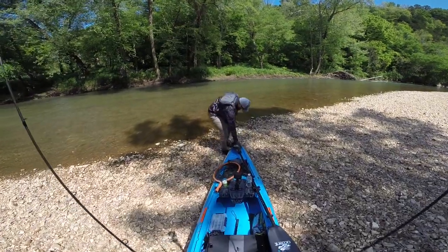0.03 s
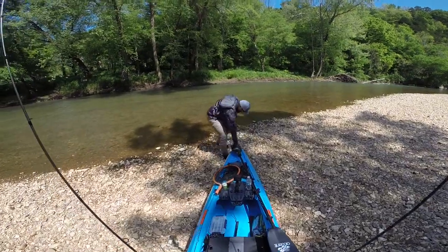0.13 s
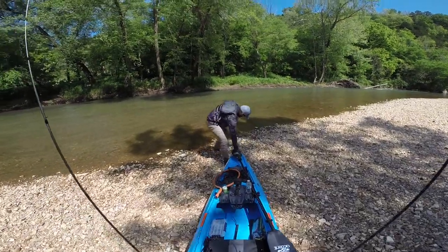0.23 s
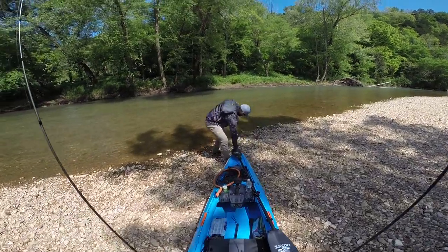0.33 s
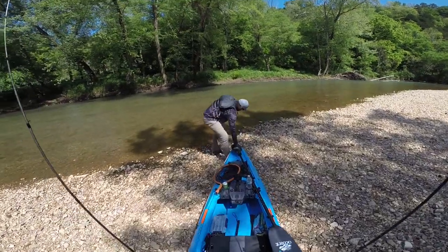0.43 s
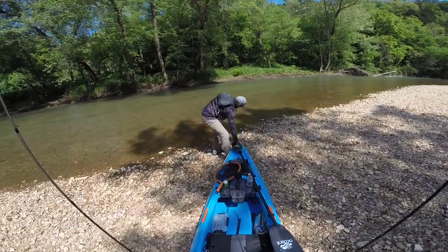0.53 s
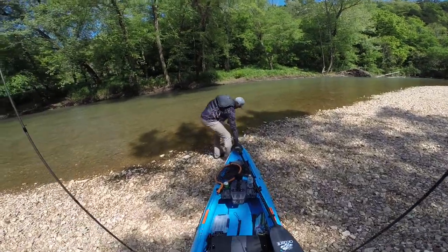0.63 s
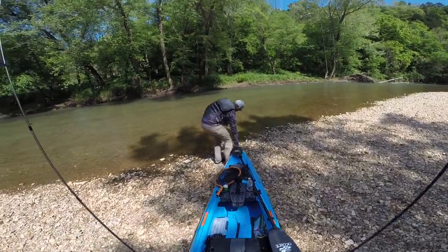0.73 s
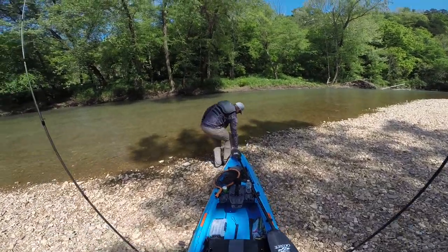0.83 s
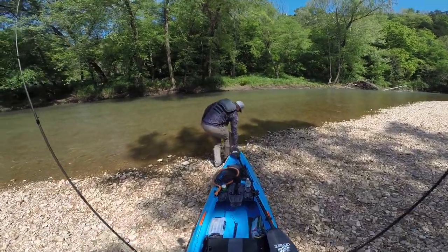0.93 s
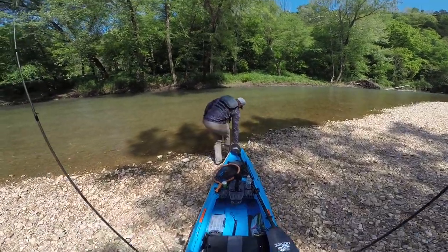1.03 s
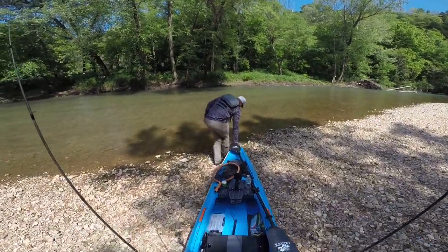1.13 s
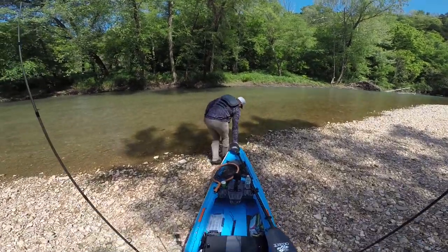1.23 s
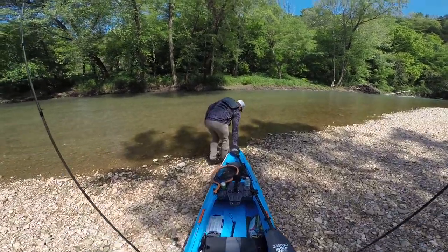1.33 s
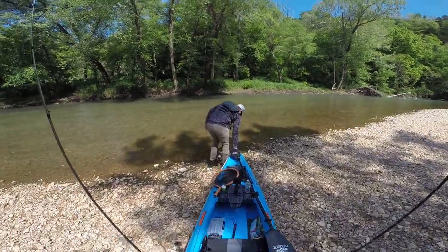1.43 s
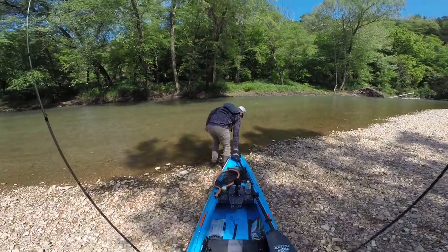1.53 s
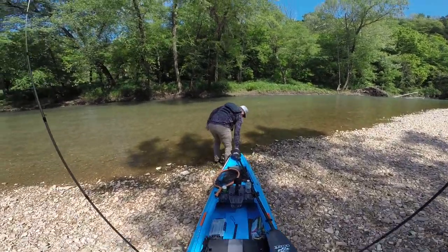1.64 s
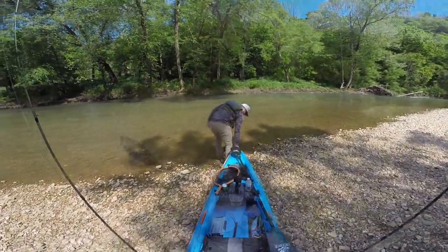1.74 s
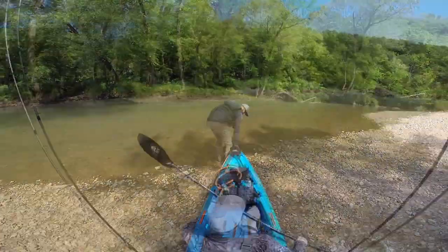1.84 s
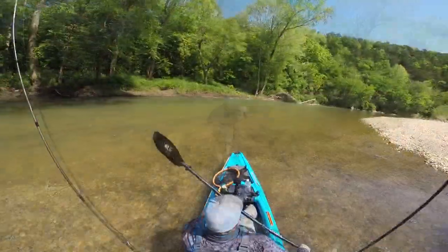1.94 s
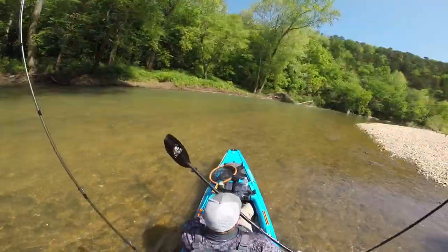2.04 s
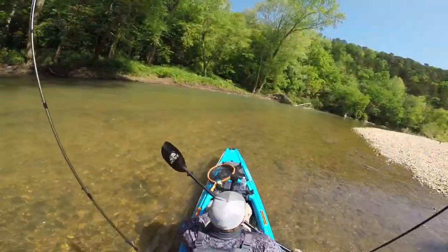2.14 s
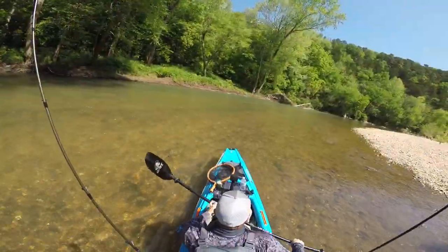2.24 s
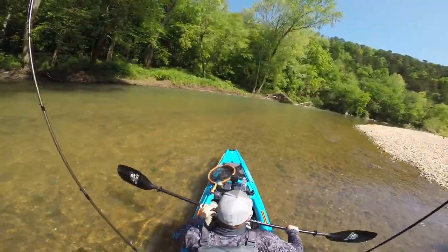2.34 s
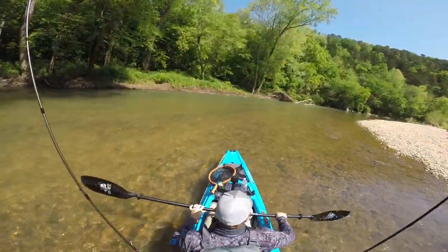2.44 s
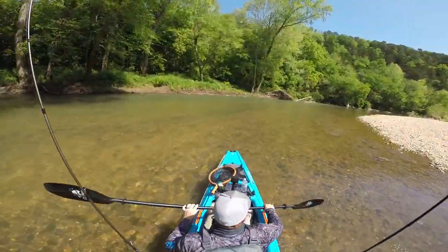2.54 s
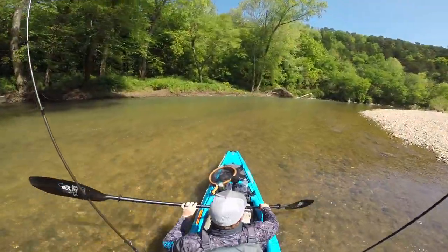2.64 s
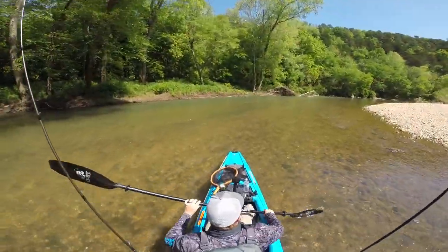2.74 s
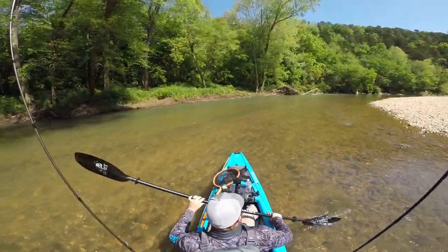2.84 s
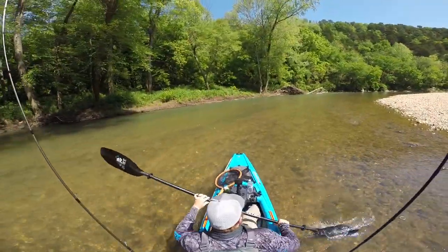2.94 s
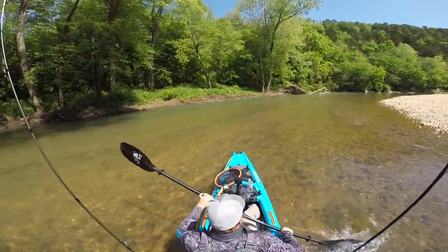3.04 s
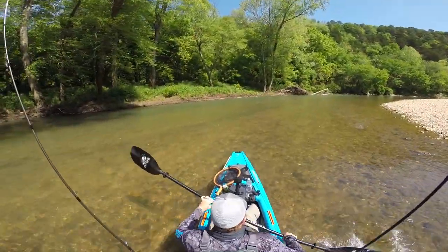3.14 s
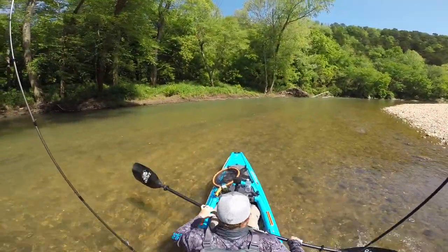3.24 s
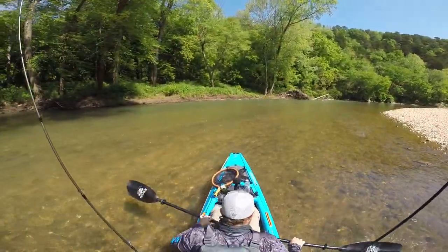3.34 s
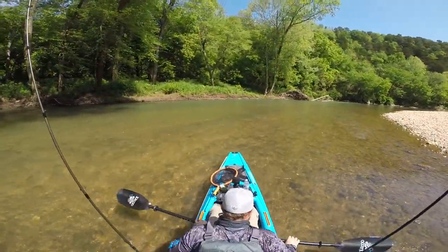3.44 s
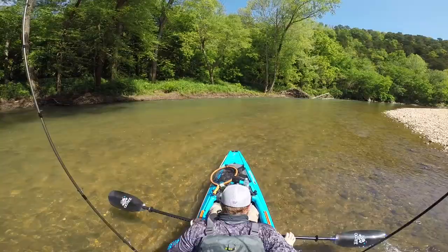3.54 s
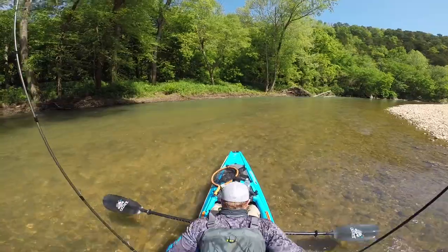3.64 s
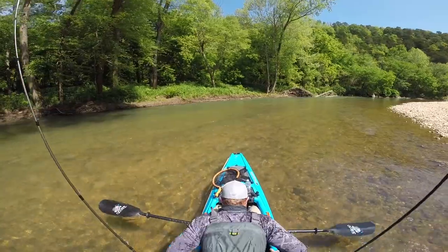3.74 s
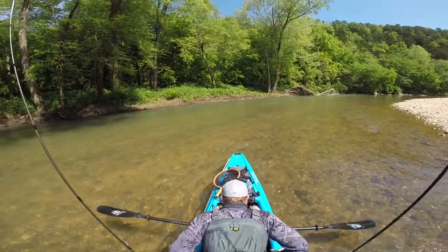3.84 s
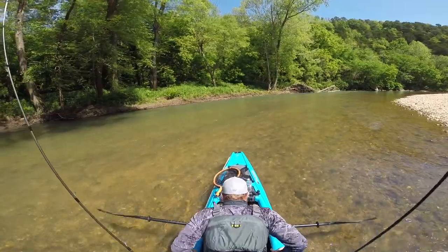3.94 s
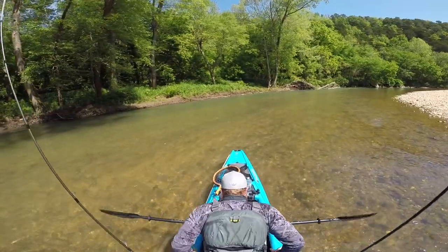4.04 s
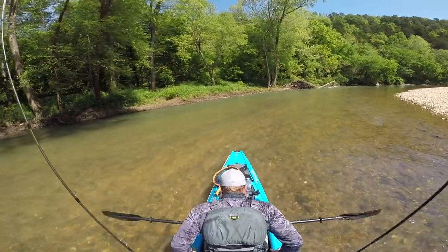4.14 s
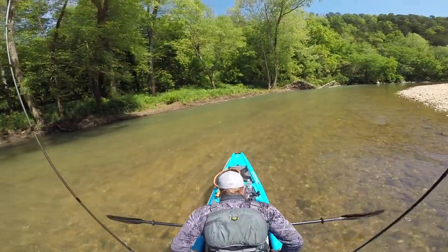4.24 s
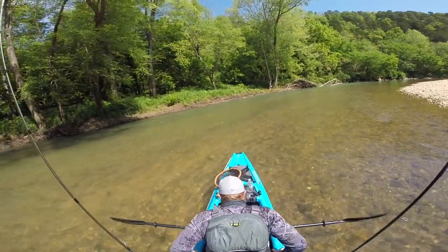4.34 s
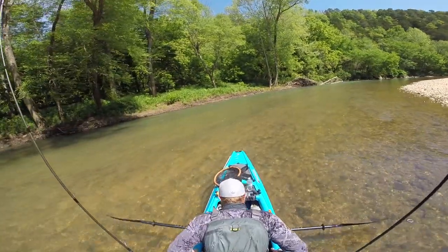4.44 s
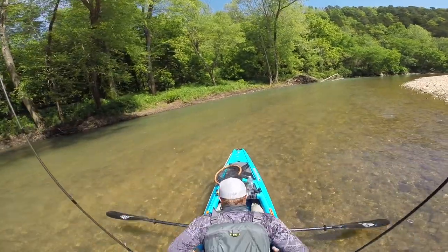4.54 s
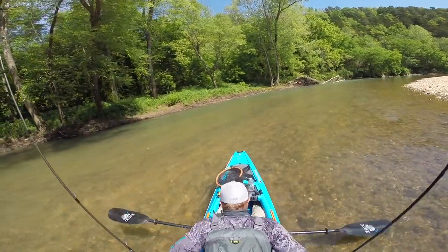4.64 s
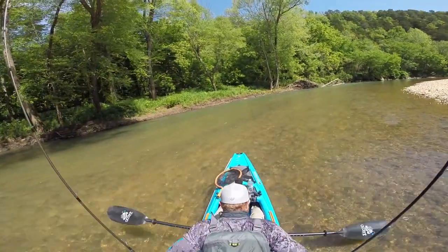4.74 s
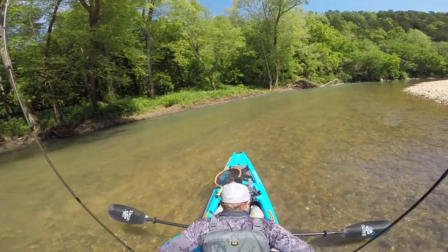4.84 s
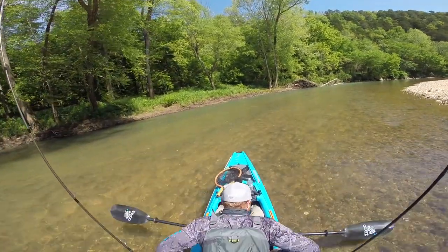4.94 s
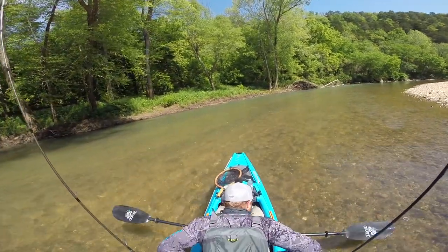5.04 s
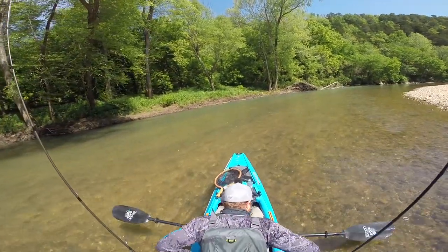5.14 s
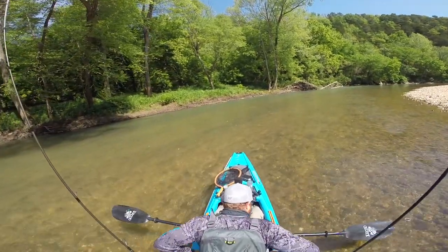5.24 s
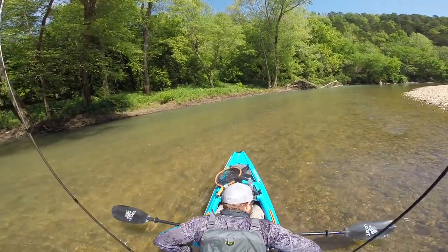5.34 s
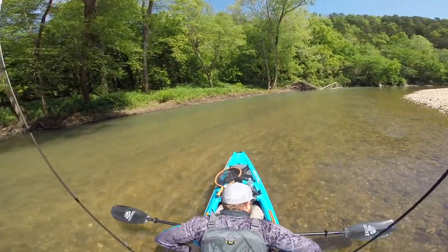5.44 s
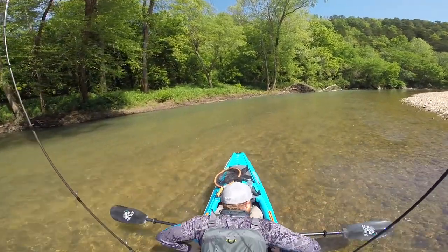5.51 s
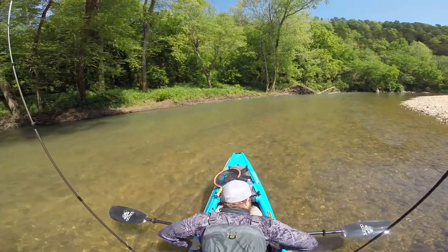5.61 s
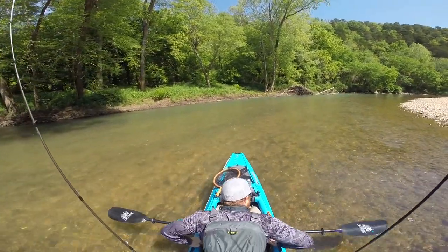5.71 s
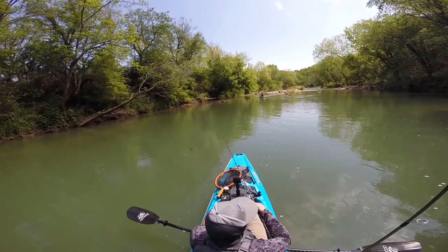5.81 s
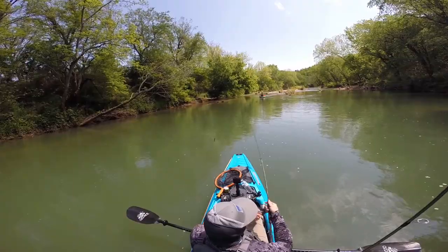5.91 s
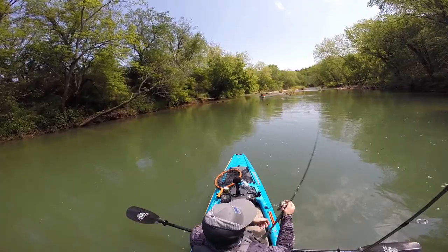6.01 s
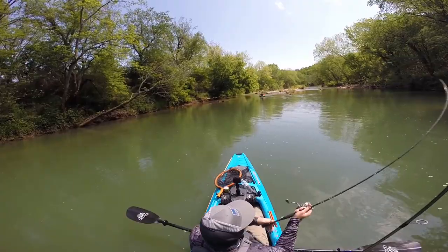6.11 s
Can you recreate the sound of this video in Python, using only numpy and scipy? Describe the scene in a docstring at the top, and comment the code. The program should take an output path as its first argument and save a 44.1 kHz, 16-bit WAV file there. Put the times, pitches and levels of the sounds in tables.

```python
"""Stones grind under a plastic kayak dragged over river gravel; then it floats off with a paddle stroke. The
microphone is close: it rides on a pole fixed to the hull, shut in a case. Chance contacts ring the hull's
modes; loose gravel and water rattle in the air as coloured grains, rings and snaps, their bright band changing
colour once. Gear knocks on the deck as blows with slips, jolts thud, and gurgles are climbing tones. Low noise
is wind and pole shake, faint noise the river, with thin steady whines."""
import sys
import numpy as np
from scipy import signal
from scipy.fft import rfft, irfft
from scipy.io import wavfile

SR = 44100
rng = np.random.default_rng(int(sys.argv[2]) if len(sys.argv) > 2 else 0)


def log_audio(samples):
    """Write samples as a 16-bit WAV file to the path given in sys.argv[1]."""
    # one column per channel
    frames = np.atleast_2d(samples).T
    # limit to full scale, then quantise
    limited = np.clip(frames, -1, 1)
    pcm = np.round(limited * 32767).astype(np.int16)
    wavfile.write(sys.argv[1], SR, pcm)


N = 272046  # samples

# Hull modes, the last one the case's own: pitch_hz, width_hz, relative_level_db
HULL_MODES = [(78.4, 35, -9.5), (106.8, 10, -8), (144.5, 47, -6), (202, 18, -5.5), (248.2, 28, -5.5),
              (296, 28.6, -0.5), (357.7, 67, -1.5), (485, 60, -3.5), (551, 210, -1.5), (672, 69, -2),
              (785, 170, 0.5), (888.7, 72, 0.5), (972, 76, -4.5), (1173, 30.4, -13.5), (1334, 93, -1.5)]
# Steady working of stones, then water, under the hull, before the case's filtering:
# time_s, upper_modes_rms_db, lower_modes_rms_db, case_resonance_rms_db
GRIND_CURVE = [(0, -24.5, -31, -59), (.29, -29.5, -31.5, -34.5), (.4, -22.5, -31.5, -36.5),
               (.56, -31, -38, -54), (.66, -22, -34.5, -43), (.8, -32, -42, -42), (.85, -27, -22, -39),
               (1.0, -19, -24, -29), (1.2, -22.5, -23, -42), (1.41, -25, -26.5, -35.5),
               (1.79, -24.5, -33, -34), (1.93, -31, -33, -36.5), (2.2, -35.5, -41.5, -56),
               (2.32, -39, -54, -49), (2.62, -48, -56, -73), (2.9, -54.5, -59, -54),
               (3.12, -44, -54, -56.5), (3.17, -39.5, -38.5, -58), (3.45, -34, -38, -55),
               (3.65, -39.5, -43, -43.5), (3.7, -42, -46, -60), (3.93, -46, -47.5, -52),
               (4.1, -51.5, -55.5, -72), (4.3, -55, -70, -74), (4.45, -54, -52.5, -64),
               (4.78, -53, -63, -63.5), (5.3, -56.5, -51, -53.5), (5.6, -57, -58.5, -70),
               (6.17, -56.5, -59, -79)]
# Loose gravel and running water through the air: time_s, mid_band_rms_db, high_band_rms_db
RATTLE_CURVE = [(0, -44, -55), (.45, -42.5, -59.5), (.87, -41, -52), (1.05, -38.5, -51), (1.3, -37, -52),
                (1.65, -48, -58), (1.72, -41, -58), (1.92, -44, -58.5), (2.14, -45, -51),
                (2.45, -52, -58.5), (2.6, -56, -62), (2.87, -61, -66), (3.1, -52, -61), (3.18, -43.5, -48),
                (3.47, -44, -48.5), (3.72, -50.5, -56.5), (3.9, -53, -58.5), (4.13, -55.5, -66),
                (4.3, -62.5, -70), (4.6, -60.5, -70.5), (5.0, -63, -80), (6.17, -61, -82)]
# Lowest sounds: time_s, wind_and_pole_rms_db, hull_boom_rms_db (boom before the case's filtering)
LOW_CURVE = [(0, -52, -38), (.33, -48, -43.5), (.6, -60, -40), (.75, -45.5, -23), (1.41, -40, -30),
             (1.63, -43, -27), (1.7, -50, -42), (1.86, -50, -39), (1.94, -40, -38), (2.06, -28.5, -29),
             (2.25, -43.5, -39.5), (2.45, -43, -63), (2.7, -57.5, -67), (3.04, -44, -62), (3.14, -35, -61),
             (3.26, -47, -48), (3.7, -46, -73), (4.12, -46.5, -52.5), (4.4, -56.5, -55.5), (4.69, -41, -47),
             (4.77, -55.5, -54), (5.12, -56, -62), (5.46, -56, -54), (5.6, -47, -78), (5.8, -55, -54),
             (5.88, -61.5, -57), (6.17, -55, -55)]
# Colours of the air sounds, the low noise and the river: pitch_hz, relative_level_db (per Hz)
MID_RATTLE_COLOUR = [(850, -26), (1450, -1.5), (1550, -8), (1890, -9), (2440, -8.5), (2860, -10),
                     (3150, -10), (4120, -30.5), (4400, -57), (5720, -41), (9680, -120)]
EARLY_HIGH_COLOUR = [(2240, -19), (3800, 7), (4150, -38), (4420, -2.5), (5050, -5), (6710, 1.5), (7750, -1),
                     (8910, -13.5), (10300, -10.5), (11600, -19), (13900, -11), (14600, -30), (15200, -26)]
LATE_HIGH_COLOUR = [(2240, 7.5), (3800, -4), (5320, 4.5), (5940, 5), (6360, 1), (7060, -13), (10500, -11),
                    (11600, -16), (12800, -12), (15200, -18)]
RUMBLE_COLOUR = [(12, -21), (25, 0), (45, -8.5), (70, -7), (120, -34)]
RIVER_COLOUR = [(59, -34), (100, 2), (209, 0.5), (346, -7), (768, 1.5), (1570, -12.5), (2110, -13.5),
                (4580, -15), (5650, -17.5), (12600, -29), (15200, -44)]
# Faint steady whines: start_s, pitch_hz, rms_db
WHINES = [(0, 8780, -95), (0, 11719, -92), (5.817, 14626, -82)]
# Bright snaps: start_s, relative_level_db
SNAPS = [(0.1356, -40), (0.163, -36), (0.1865, -49.5), (0.466, -35), (0.523, -28), (0.772, -36),
         (0.816, -41), (0.925, -38), (0.939, -32), (0.9717, -41), (0.9976, -35), (1.2017, -46),
         (1.3234, -44), (1.442, -29.5), (1.484, -35), (1.509, -28), (1.5534, -40), (1.578, -30.5),
         (1.671, -29.5), (2.0128, -41), (2.2353, -37), (2.471, -41), (2.5037, -50), (2.649, -45),
         (3.1263, -39), (3.174, -41), (3.4151, -47), (3.4531, -46), (3.5124, -44), (3.6631, -45),
         (3.7519, -36), (3.78, -44), (3.8117, -45), (4.0317, -48), (5.648, -44), (5.758, -48), (5.8, -46)]
# Crunches and splashes that build up and break off:
# peak_time_s, mid_band_level_db, high_band_level_db, build_up_s
CRUNCHES = [(.16, -48, -54, 0.026), (0.537, -39.5, -42, 0.041), (.9, -28, -65, 0.0068),
            (.94, -32, -55, 0.022), (1.02, -30.5, -47, 0.034), (1.101, -27.5, -44, 0.016),
            (1.2, -35, -47, 0.024), (1.227, -34, -49, 0.024), (1.27, -31, -64, 0.017),
            (1.328, -42, -57, 0.013), (1.673, -47, -43.5, 0.0042), (2.031, -55, -44.5, 0.058),
            (2.54, -51, -46, 0.06), (2.89, -56, -68, .012), (3.13, -59, -48, .01), (3.57, -47, -55, 0.019),
            (3.81, -48, -46, 0.034), (3.87, -60, -57, 0.0074), (5.236, -56, -70, 0.027),
            (5.38, -54, -74, 0.039), (5.435, -44.5, -56, .01), (5.672, -64, -69, .05),
            (5.76, -50, -58, 0.0045)]
# Knocks and short slips on the hull, before the case's filtering:
# start_s, peak_db, favoured_pitch_hz, relative_case_ring_db
KNOCKS = [(0.243, -20, 740, 14), (0.403, -18, 880, -24), (0.695, -2, 356, -13.5), (0.808, -11.5, 640, -13),
          (0.835, -10.5, 296, 7), (0.883, -8, 640, -9), (0.965, -12, 673, 0), (1.005, -5.5, 706, -29),
          (1.09, -7, 507, -21), (1.422, -13.5, 299, -5), (1.456, -8.5, 840, -24), (1.511, -14, 880, -31),
          (1.602, -8.5, 850, -26), (1.732, -13.5, 1080, -24), (2.027, -19.5, 955, -33),
          (2.226, -19, 320, -13), (2.302, -26, 880, -7), (2.507, -26.5, 765, -6), (2.717, -30, 855, -21),
          (2.894, -31, 900, -10), (3.139, -27, 282, -13), (3.293, -22.5, 331, 1), (3.359, -24, 748, -6),
          (3.429, -22.5, 856, -5), (3.791, -27.5, 293, -7), (3.834, -28, 870, -20), (3.872, -28, 980, -9),
          (3.914, -28, 710, -9), (3.941, -29, 918, -4), (4.048, -34, 840, -23), (4.133, -33, 740, -16),
          (4.158, -34, 830, -24), (4.436, -33, 256, -13), (4.493, -33, 624, -21), (4.67, -32.5, 885, -24),
          (4.857, -34.5, 666, -8), (4.985, -36, 624, -13), (5.081, -38, 640, -23), (5.112, -35, 670, -22),
          (5.198, -24, 910, -0.5), (5.227, -30, 830, -11), (5.256, -32, 635, -11), (5.313, -32.5, 970, -7),
          (5.377, -26, 700, -6), (5.419, -28.5, 940, 6), (5.522, -33, 1030, -6), (5.565, -37, 654, -6),
          (5.608, -41, 904, -13), (5.65, -40.5, 310, -25), (5.769, -27.5, 980, -8)]
# The hull is jolted: peak_time_s, upper_modes_db, lower_modes_db, boom_db, build_up_s, dying_s
JOLTS = [(.408, -32, -23.5, -31, 0.0035, 0.0094), (.697, -23.5, -14, -26, .002, 0.062),
         (0.84, -19.5, -20, -34, 0.012, 0.069), (1.455, -25, -16.5, -27.5, 0.016, 0.013),
         (2.18, -41, -34, -46, 0.034, 0.013), (2.519, -36.5, -40.5, -44, 0.018, .04),
         (3.8, -45, -37.5, -38, 0.056, 0.048), (3.88, -55, -44, -34, 0.037, 0.023),
         (4.162, -38.5, -66, -56, 0.014, 0.016), (4.511, -62, -53, -41, 0.021, .025),
         (4.64, -62, -54, -52, .04, 0.05), (4.85, -60, -49, -60, .02, .015),
         (5.119, -43, -66, -68, 0.0061, 0.034), (5.431, -40.5, -43.5, -52, 0.025, 0.014),
         (5.535, -66, -50, -64, 0.015, .015), (5.658, -50, -43.5, -44, 0.015, 0.022),
         (5.7, -65, -59, -42.5, 0.025, 0.026), (5.807, -42, -39.5, -32.5, 0.031, .005)]
# Ringing ticks of stones and drops: start_s, relative_level_db, pitch_hz
TICKS = [(0.4683, -33, 1940), (0.517, -21.5, 3260), (0.8185, -24.5, 3410), (0.8992, -19, 2130),
         (0.9208, -16, 2560), (1.0066, -34, 3200), (1.0224, -16, 1990), (1.0913, -16, 2300),
         (1.3223, -12.5, 2440), (1.324, -22, 3470), (0.9223, -22, 3330), (1.482, -24, 2620),
         (1.5088, -23.5, 3500), (1.5489, -29, 2740), (1.6165, -28, 2420), (1.648, -34, 2450),
         (1.672, -11.5, 3110), (2.0054, -27, 2660), (2.1625, -31, 2970), (2.399, -33, 2500),
         (2.7692, -36, 2520), (2.8953, -30.5, 2350), (3.031, -36, 2500), (3.1278, -35, 2430),
         (3.1624, -33, 1900), (3.2923, -25, 2020), (3.4526, -38, 2220), (3.5473, -28, 3060),
         (3.6012, -29, 2090), (3.875, -22.5, 2500), (4.0988, -32.5, 2660), (4.635, -31.5, 2590),
         (5.316, -39, 3020), (5.4166, -38, 3000), (5.7723, -35, 2140)]
# Gurgles under the hull and round the paddle blade, before the case's filtering:
# centre_s, peak_db, centre_pitch_hz, length_s (centre to 1/e of the peak)
GURGLES = [(1.999, -27.5, 250, 0.016), (2.18, -29.5, 310, 0.022), (2.966, -52, 275, 0.024),
           (3.027, -49, 336, 0.038), (3.076, -44, 360, .015), (3.186, -29, 270, 0.016),
           (3.245, -29.5, 205, 0.01), (3.311, -39, 316, .025), (3.382, -31, 638, 0.014),
           (3.44, -32.5, 300, 0.014), (3.565, -32, 210, 0.015), (3.645, -30, 300, 0.0076),
           (3.797, -34, 299, 0.011), (4.448, -51, 350, 0.014)]

BOOM_TOP_HZ, LOWER_TOP_HZ, UPPER_TOP_HZ = 170, 430, 1280  # mode groups; the case lies above
CASE_LOW_HZ, CASE_HIGH_HZ = 60, 1507  # hull vibration passed by the case
COLOUR_FADE_START_S, COLOUR_FADE_END_S = 1.75, 1.93  # the high band's colour crossfades
RIVER_RMS_DB = -58
CRUNCH_FALL_S = 0.01
KNOCK_SPREAD_OCT, SLIP_S = 0.35, 0.012  # modes near the favoured pitch ring; slips die away
THUD_DB, THUD_CONTACT_S = 13, 0.0014  # blow over the jolt's boom level, before build-up scaling
GURGLE_RISE = 0.12  # share by which the pitch climbs over one length
CUTOFF_HZ = 15350


def amp(db):
    """Decibels to amplitude."""
    return 10 ** (np.asarray(db) / 20)


def rms_one(x):
    """Scale to rms 1."""
    return x / np.sqrt(np.mean(x ** 2) + 1e-20)


def in_time(rows):
    """Columns of a curve table, drawn straight from point to point, sample by sample."""
    time_s, *columns = np.transpose(rows)
    return [np.interp(np.arange(N) / SR, time_s, column) for column in columns]


def swell(steady_db, peak_s, peak_db, rise_s, fall_s):
    """Level in dB with bursts added in power; each grows and dies away exponentially."""
    t, power = np.arange(N) / SR, amp(2 * steady_db)
    for at, db, rise, fall in np.broadcast(peak_s, peak_db, rise_s, fall_s):
        late = t - at
        slope_s = np.where(late < 0, max(rise, 1e-3), max(fall, 1e-3))
        power = power + amp(2 * db) * np.exp(-2 * np.abs(late) / slope_s)
    return 10 * np.log10(power)


def drift(rate_hz):
    """Slow chance: noise through a double one-pole low-pass, rms 1."""
    r = np.exp(-2 * np.pi * rate_hz / SR)
    noise = rng.standard_normal(N + SR)
    settled = signal.lfilter([1], [1, -2 * r, r * r], noise)[SR:]
    return rms_one(settled)


def grains(per_s, spread_db, clump_db, clump_rate):
    """Random contacts of uneven size that come in clumps, rms 1."""
    sizes = amp(spread_db * np.minimum(rng.exponential(1, N), 3.2)) * rng.choice([-1, 1], N)
    struck = rng.random(N) < per_s / SR
    return rms_one(sizes * struck * amp(clump_db * drift(clump_rate)))


def resonate(x, hz, width_hz):
    """A damped mode: a unit click sets a sine of starting height 1 ringing."""
    r, w = np.exp(-np.pi * width_hz / SR), 2 * np.pi * min(hz, 0.45 * SR) / SR
    return signal.lfilter([0, np.sin(w)], [1, -2 * r * np.cos(w), r * r], x + 1e-18)


def colour(x, spectrum):
    """Causal (minimum-phase) filter with the given spectrum, falling steeply outside it; rms 1."""
    size = 8192
    hz, db = np.transpose(spectrum)
    grid = np.log(np.maximum(np.arange(size // 2 + 1) * SR / size, 1))
    outside = np.maximum(np.log(hz[0]) - grid, 0) + np.maximum(grid - np.log(hz[-1]), 0)
    shape_db = np.interp(grid, np.log(hz), db) - np.minimum(60 * outside, 60)
    cepstrum = irfft(shape_db * np.log(10) / 20)
    # folding the cepstrum forward makes the filter causal
    cepstrum[1:size // 2] *= 2
    cepstrum[size // 2 + 1:] = 0
    impulse = irfft(np.exp(rfft(cepstrum)))
    return rms_one(signal.fftconvolve(x, impulse)[:N])


def grind(boom_db, lower_db, upper_db, case_db):
    """Stones and water drive every hull mode: shared contacts, lone bumps on one mode, a smooth rub."""
    shared = grains(900, spread_db=5.5, clump_db=4.5, clump_rate=33)
    groups = np.zeros((4, N))
    for k, (hz, width_hz, db) in enumerate(HULL_MODES):
        bumps = grains(70, spread_db=3.0, clump_db=1.5, clump_rate=25.5)
        push = 0.5 * shared + 0.94 * bumps + 0.84 * rng.standard_normal(N)
        group = np.searchsorted((BOOM_TOP_HZ, LOWER_TOP_HZ, UPPER_TOP_HZ), hz)
        gain = (-1) ** k * amp(db) * np.sqrt(width_hz)  # neighbouring modes have opposite signs
        groups[group] += gain * resonate(push, hz, width_hz)
    levels_db = (boom_db, lower_db, upper_db, case_db)
    return sum(amp(db) * rms_one(group) for db, group in zip(levels_db, groups))


def pebbles():
    """Pebbles and drops ring a few cycles each, at pitches across the mid band; rms 1."""
    out = np.zeros(N)
    for hz in np.geomspace(1900, 3600, num=8):
        contacts = grains(45, spread_db=3.5, clump_db=4.5, clump_rate=39.0)
        out += resonate(contacts, hz, 0.049 * hz)
    return rms_one(out)


def rattle(mid_db, high_db):
    """Fine contacts heard through the air in two bands; the high band's colour crossfades once."""
    fine = grains(4000, spread_db=1.5, clump_db=1.5, clump_rate=22)
    finer = grains(6000, spread_db=8.5, clump_db=5.5, clump_rate=42)
    coarse = grains(500, spread_db=0.0, clump_db=6.5, clump_rate=29)
    late_share = np.interp(np.arange(N) / SR, (COLOUR_FADE_START_S, COLOUR_FADE_END_S), [0, 1])
    early_high = np.sqrt(1 - late_share) * colour(fine + finer, EARLY_HIGH_COLOUR)
    late_high = np.sqrt(late_share) * colour(fine + finer, LATE_HIGH_COLOUR)
    mid = colour(2.0 * fine + coarse, MID_RATTLE_COLOUR) + 0.35 * pebbles()
    return amp(mid_db) * rms_one(mid) + amp(high_db) * (early_high + late_high)


def rumble(level_db):
    """Lumpy low noise from wind and the shaking pole."""
    lumpy = rng.standard_normal(N) * amp(1.6 * drift(9.3))
    return amp(level_db) * colour(lumpy, RUMBLE_COLOUR)


def background():
    """Smooth river hiss as coloured noise, and the thin whines as steady sines."""
    t = np.arange(N) / SR
    whines = sum(np.sqrt(2) * amp(db) * (t > s) * np.sin(2 * np.pi * hz * t) for s, hz, db in WHINES)
    return amp(RIVER_RMS_DB) * colour(rng.standard_normal(N), RIVER_COLOUR) + whines


def snaps():
    """Dry cracks of a few milliseconds: dying noise in two bright bands."""
    t, out = np.arange(SR // 40) / SR, np.zeros(N + SR)
    for start_s, level_db in SNAPS:
        at = round(start_s * SR)
        hiss = rng.standard_normal(len(t))
        out[at:at + len(t)] += amp(level_db - 5.5) * hiss * np.exp(-t / 0.0024)
    band = signal.butter(2, [5400, 10500], "band", fs=SR, output="sos")
    top = signal.butter(2, [12000, 14500], "band", fs=SR, output="sos")
    return signal.sosfilt(band, out[:N]) + 0.48 * signal.sosfilt(top, out[:N])


def knocks():
    """A blow and a dying burst of slips; modes near the struck spot's own pitch ring most."""
    t, out = np.arange(SR // 8) / SR, np.zeros(N + SR)
    hz, width_hz, db = np.transpose(HULL_MODES)[:, :, None]
    soft_contact = np.minimum(t / 0.0011, 1)
    rings = np.sin(2 * np.pi * hz * t) * np.exp(-1.1 * np.pi * width_hz * t) * soft_contact
    for start_s, peak_db, spot_hz, case_db in KNOCKS:
        luck_db = 2 * rng.standard_normal((len(HULL_MODES), 1))
        distance = np.log2(hz / spot_hz) / KNOCK_SPREAD_OCT
        strength_db = 0.37 * db + luck_db - 10 * distance ** 2
        strength_db[-1] = case_db + 6.5
        slips = rng.standard_normal(len(t)) * np.exp(-t / SLIP_S)
        push = 0.06 * slips + (t == 0)
        knock = signal.fftconvolve(push, np.sum(amp(strength_db) * rings, axis=0))[:len(t)]
        at = round(start_s * SR)
        out[at:at + len(t)] += amp(peak_db) * knock / np.abs(knock).max()
    return out[:N]


def thuds():
    """A jolt strikes the modes below the upper group once; the slower its build-up, the softer the blow."""
    t, out = np.arange(SR // 4) / SR, np.zeros(N + SR)
    low_modes = [mode for mode in HULL_MODES if mode[0] < LOWER_TOP_HZ]
    hz, width_hz, db = np.transpose(low_modes)[:, :, None]
    ring = np.sum(amp(db) * np.sin(2 * np.pi * hz * t) * np.exp(-np.pi * width_hz * t), axis=0)
    for peak_s, _, _, boom_db, build_s, _ in JOLTS:
        at = round((peak_s - THUD_CONTACT_S) * SR)
        suddenness = THUD_CONTACT_S / max(build_s, 1e-3)
        out[at:at + len(t)] += amp(boom_db + THUD_DB) * suddenness * ring
    return out[:N]


def ticks():
    """A short ring at the stone's or drop's own pitch, with a weaker second mode."""
    t, out = np.arange(SR // 40) / SR, np.zeros(N + SR)
    envelope = np.exp(-t / 0.0022) * np.minimum(t / 0.0011, 1)
    for start_s, level_db, hz in TICKS:
        ring = np.sin(2 * np.pi * hz * t) + 0.19 * np.sin(2 * np.pi * 1.166 * hz * t)
        at = round(start_s * SR)
        out[at:at + len(t)] += amp(level_db - 2.5) * ring * envelope
    return out[:N]


def gurgles():
    """Pockets of air close under water: a soft blob of tone whose pitch climbs."""
    out = np.zeros(N)
    for centre_s, peak_db, hz, length_s in GURGLES:
        t = np.arange(N) / SR - centre_s
        cycles = hz * t * (1 + GURGLE_RISE * t / length_s / 2)
        out += amp(peak_db) * np.exp(-(t / length_s) ** 2) * np.sin(2 * np.pi * cycles)
    return out


def scene():
    """All sources at one microphone; the case's band filter shapes the grind, knocks and gurgles."""
    upper_db, lower_db, case_db = in_time(GRIND_CURVE)
    wind_db, boom_db = in_time(LOW_CURVE)
    jolt_s, jolt_upper_db, jolt_lower_db, jolt_boom_db, build_s, dying_s = np.transpose(JOLTS)
    upper_db = swell(upper_db, jolt_s, jolt_upper_db, build_s, dying_s)
    lower_db = swell(lower_db, jolt_s, jolt_lower_db, build_s, dying_s)
    boom_db = swell(boom_db, jolt_s, jolt_boom_db, build_s, dying_s)
    hull = grind(boom_db, lower_db, upper_db, case_db) + knocks() + gurgles()
    case = signal.cheby1(4, 1, (CASE_LOW_HZ, CASE_HIGH_HZ), "band", fs=SR, output="sos")
    # thuds are added after the filter, so their low onset stays sharp
    hull = signal.sosfilt(case, hull) + thuds()

    mid_db, high_db = in_time(RATTLE_CURVE)
    crunch_s, crunch_mid_db, crunch_high_db, crunch_build_s = np.transpose(CRUNCHES)
    mid_db = swell(mid_db, crunch_s, crunch_mid_db, crunch_build_s, CRUNCH_FALL_S)
    high_db = swell(high_db, crunch_s, crunch_high_db, crunch_build_s, CRUNCH_FALL_S)
    air = rattle(mid_db, high_db) + ticks() + snaps()
    return (hull + air + rumble(wind_db) + background())[None]


def record(dry):
    """A steep low-pass cuts the top."""
    return signal.sosfilt(signal.ellip(12, 0.5, 50, CUTOFF_HZ, fs=SR, output="sos"), dry)


dry = scene()
out = record(dry)
log_audio(out)
```